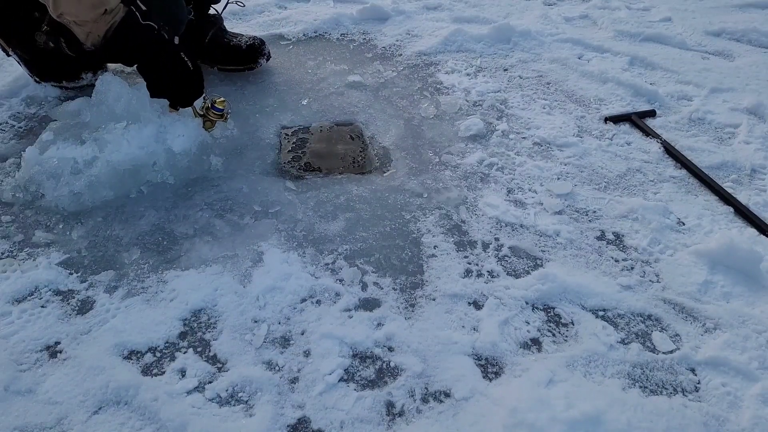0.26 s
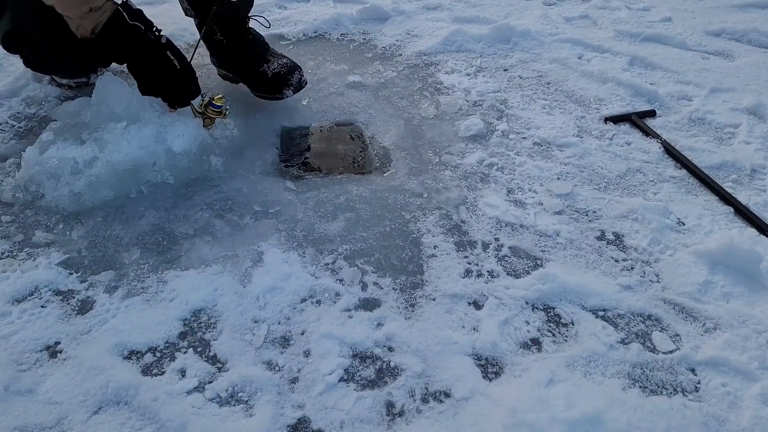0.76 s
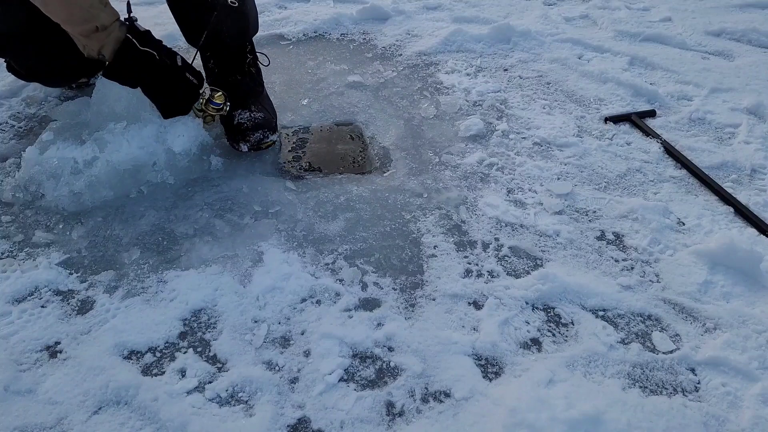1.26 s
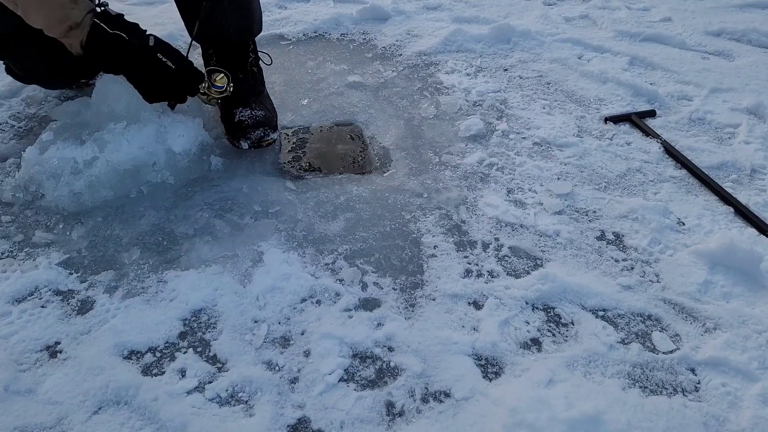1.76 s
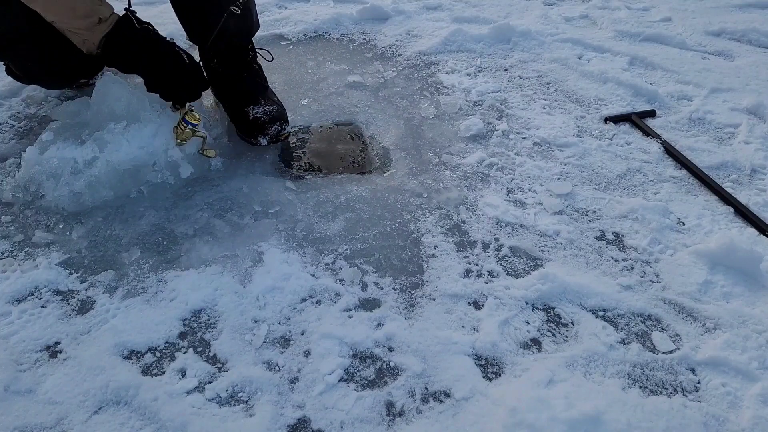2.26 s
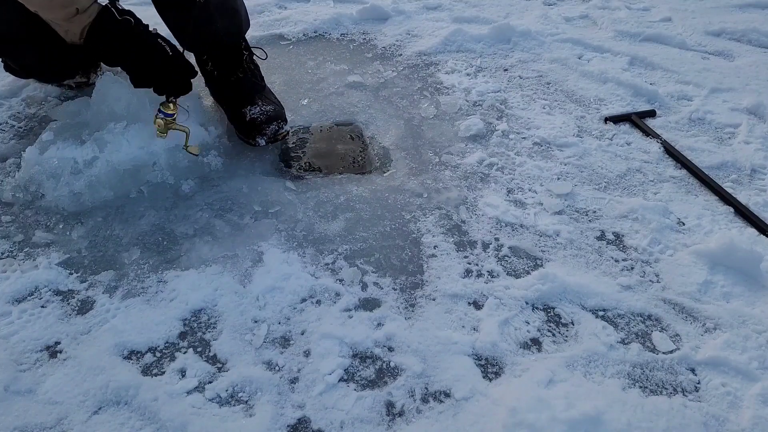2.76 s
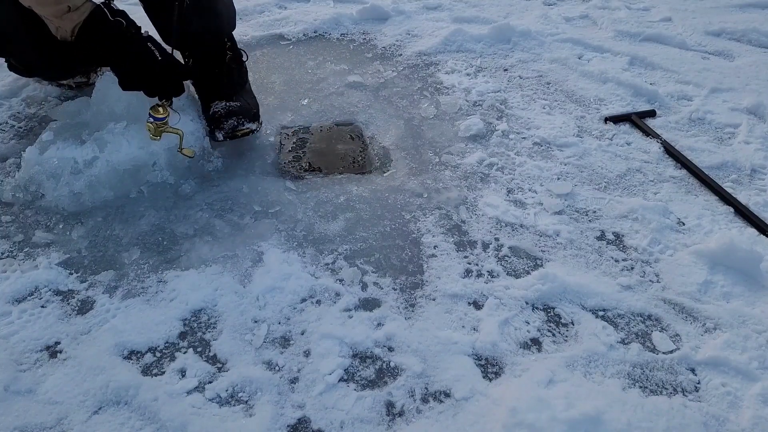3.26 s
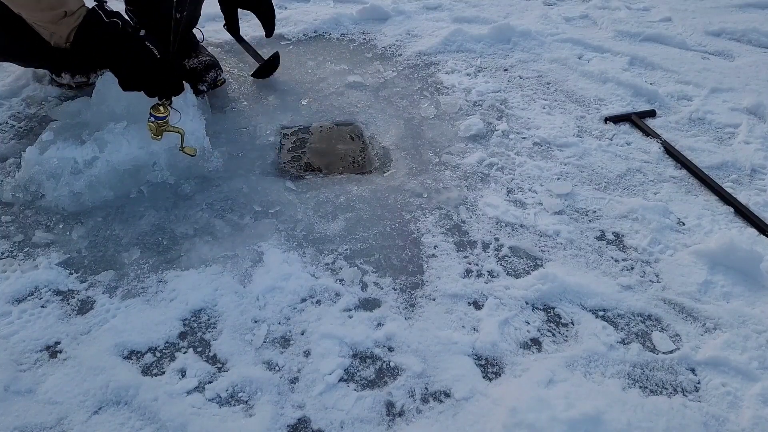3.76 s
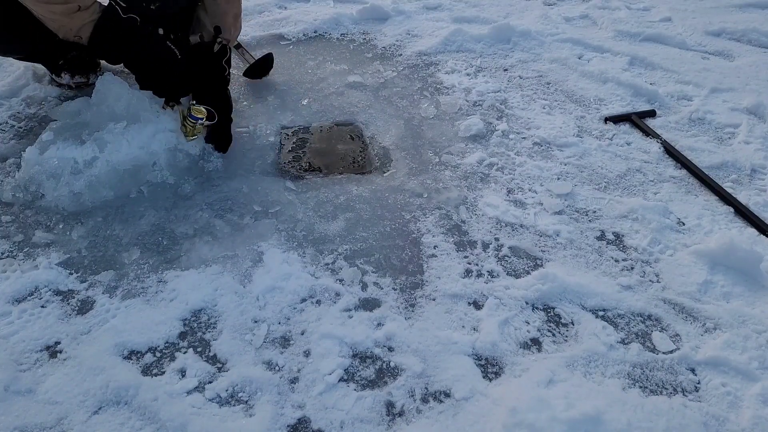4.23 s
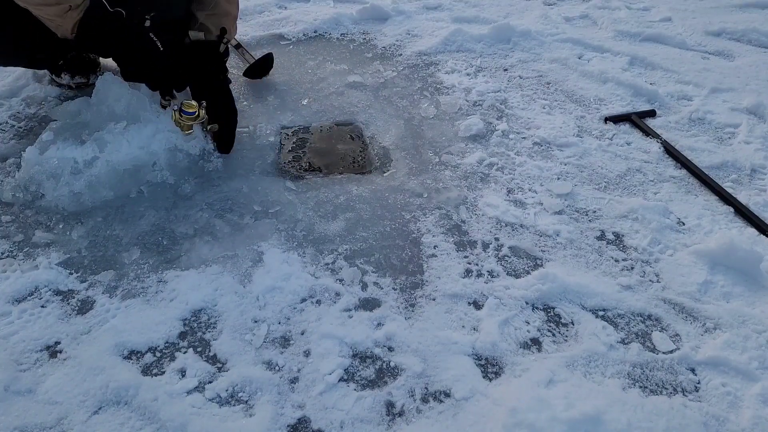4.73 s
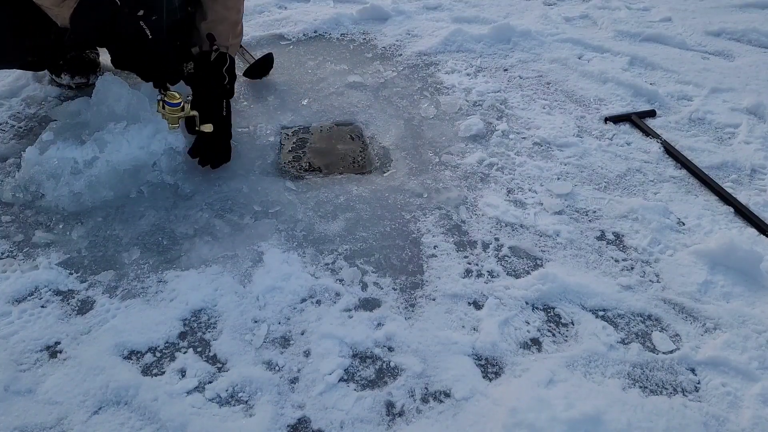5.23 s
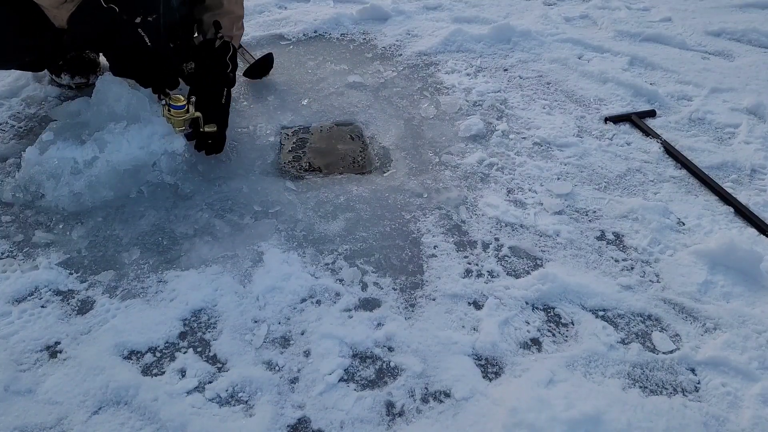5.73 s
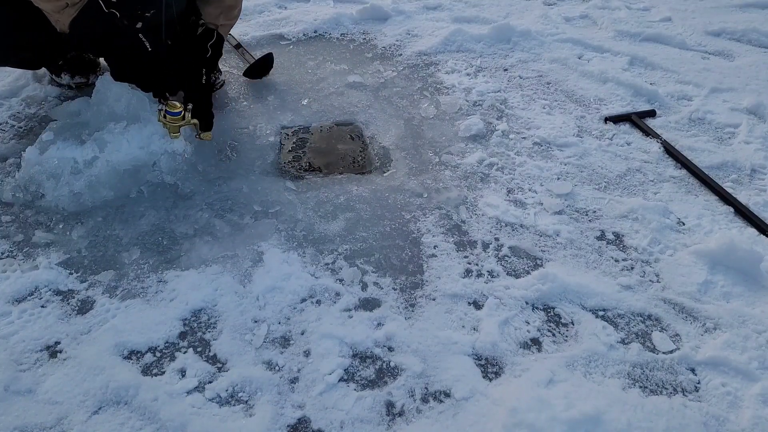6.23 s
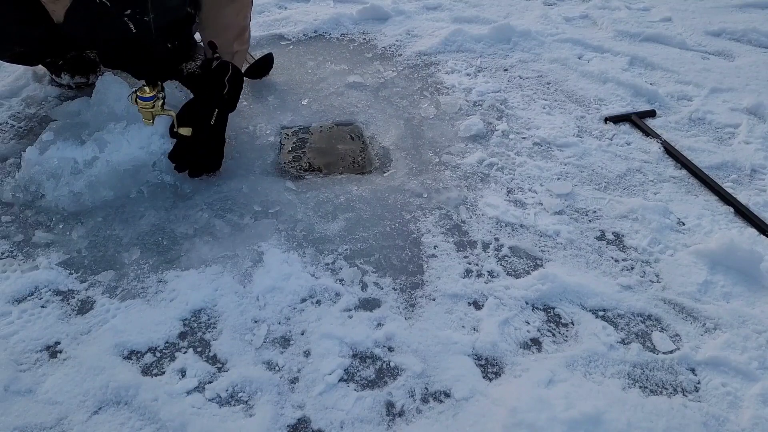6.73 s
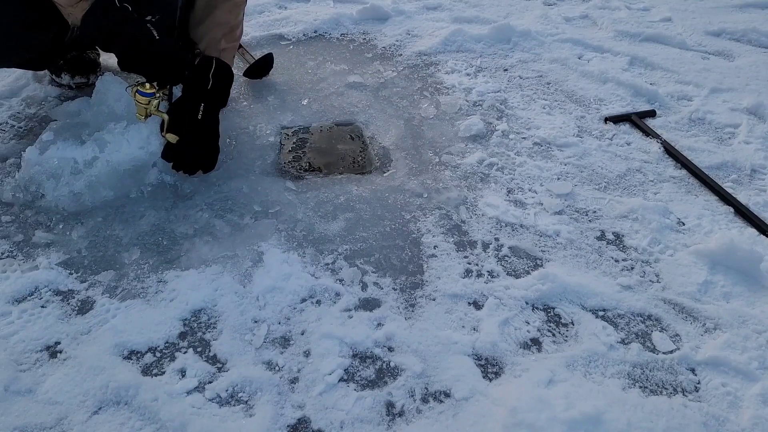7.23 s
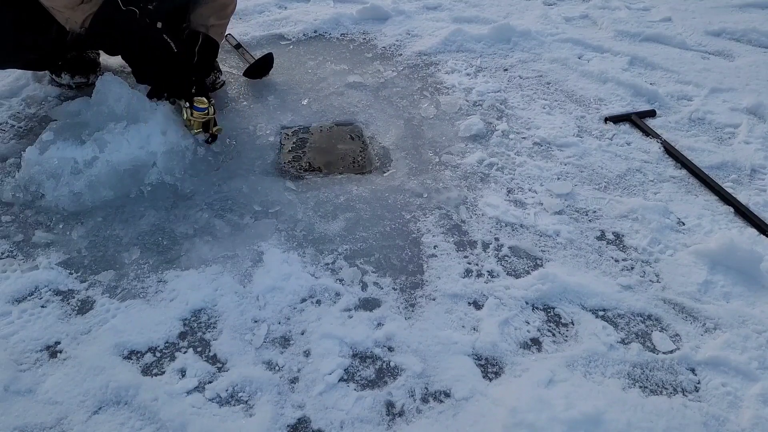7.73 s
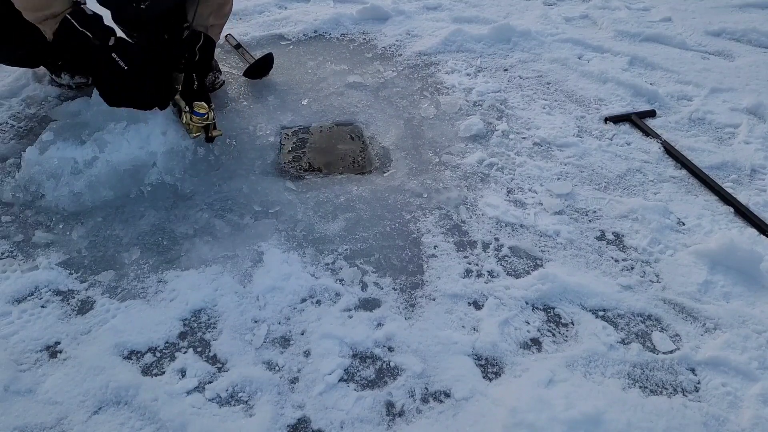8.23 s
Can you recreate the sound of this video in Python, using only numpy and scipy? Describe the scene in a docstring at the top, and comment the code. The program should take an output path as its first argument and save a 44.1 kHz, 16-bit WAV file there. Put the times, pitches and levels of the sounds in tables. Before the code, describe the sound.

Boots and gloves crunch wet slush and snow beside an ice hole while small loose metal clinks brightly; a ladle knocks onto the ice midway.

```python
"""Someone works at a hole in lake ice, left of a two-port microphone, in open air without echo.
From the start boots and gloves crunch slush and snow (noise bursts under pressure curves), crusts snap,
lumps give way (short sines) and loose hard metal clinks (decaying modes). A faint chirp falls at 2.2 s;
a ladle lands on the ice at 3.9 s and bounces (rough modes and a noise crack). Crunch and clinks go on; at
7.7 s a rubber sole squeaks in short slips (wavering sine). Faint steady coloured noise throughout."""
import sys
import numpy as np
from scipy import signal
from scipy.fft import rfft, irfft, next_fast_len
from scipy.io import wavfile
from scipy.ndimage import uniform_filter1d

SR = 44100
rng = np.random.default_rng(int(sys.argv[2]) if len(sys.argv) > 2 else 0)


def amplitude_ratio(level_db):
    """Convert a level in decibels to the matching linear amplitude (field) ratio."""
    exponent = np.asarray(level_db, float) / 20
    return 10 ** exponent


def dump_mix(stems):
    """Bounce the given channels to the path in sys.argv[1] as a 16-bit WAV at rate SR."""
    frames = np.atleast_2d(stems).T  # one column per channel
    limited = np.clip(frames, -1, 1)  # hard clip at full scale
    pcm = np.round(limited * 32767).astype(np.int16)
    wavfile.write(sys.argv[1], SR, pcm)


N = 374409


def unit(x):
    """Scaled to rms 1."""
    return x / np.sqrt(np.mean(x ** 2) + 1e-20)


def along(points, hz):
    """(f/Hz, value) points interpolated on a log frequency axis."""
    f, v = np.transpose(points)
    return np.interp(np.log(hz + 1), np.log(f + 1), v)


def filtered(x, response):
    """x times a complex response of frequency."""
    m = next_fast_len(N + 8192)
    return irfft(rfft(x, m) * response(np.fft.rfftfreq(m, 1 / SR)), m)[..., :N]


def add(track, s, sound):
    """Lays a sound into a track at time s."""
    part = track[round(s * SR):][:len(sound)]
    part += sound[:len(part)]


def sine(cycles):
    """Sine of a phase counted in cycles."""
    return np.sin(2 * np.pi * cycles)


# background noise, relative density: [f/Hz, level/dB]
BACKGROUND_SPECTRUM = [(18, -48), (30, 5.5), (65, 14), (150, 2), (480, 3.5), (1530, -9.5), (2530, -57.5),
                       (3760, -24), (7470, -2.5), (9230, -17.5), (14500, 3), (16500, -24.5)]


def background():
    """Faint steady background noise, uneven across frequency, unrelated at the two ports."""
    noise = rng.standard_normal((2, N))
    return amplitude_ratio(-85.5) * unit(filtered(noise, lambda hz: amplitude_ratio(along(BACKGROUND_SPECTRUM, hz))))


# faint falling chirps: [onset t/s, level/dB, first f/Hz, final f/Hz]
CHIRP_EVENTS = [(2.161, -49, 13500, 8100)]


def chirps():
    """A thin whistle drops quickly, levels out and is gone."""
    fall_s, length_s = 0.0045, 0.0075  # decay constant of the pitch, scale of the envelope
    out, t = np.zeros(N), np.arange(SR // 20) / SR
    for s, db, first_hz, last_hz in CHIRP_EVENTS:
        hz = last_hz + (first_hz - last_hz) * np.exp(-t / fall_s)
        envelope = np.e * t / length_s * np.exp(-(t / length_s) ** 2)
        add(out, s, amplitude_ratio(db) * envelope * sine(np.cumsum(hz) / SR))
    return out


# slips of wet rubber on ice: [centre t/s, level/dB, width at 1/e t/s]
RUBBER_SLIPS = [(7.701, -60.5, 0.019), (7.737, -72, 0.019), (7.8, -66.5, 0.099)]


def flutter():
    """Smoothed noise of rms 1."""
    return unit(uniform_filter1d(uniform_filter1d(rng.standard_normal(N), size=120), size=120))


def squeak():
    """Slipping rubber: an unsteady whistle creeps upward from slip to slip, then levels off."""
    base_hz, creep_hz_per_s, creep_s = 1020, 900, 0.09
    t = np.arange(N) / SR
    since = t - RUBBER_SLIPS[0][0]
    slips = sum(amplitude_ratio(db) * np.exp(-(2 * (t - s) / length) ** 2) for s, db, length in RUBBER_SLIPS)
    level = slips * amplitude_ratio(2.5 * flutter())
    hz = base_hz + creep_hz_per_s * np.clip(since, 0, creep_s)
    waver = 0.07 * np.clip(since / 0.06, 0.2, 1) * flutter()  # grows after the first slip
    return level * sine(np.cumsum(hz * (1 + waver)) / SR)


# single crusts of ice: [t/s, level/dB, relative level of the duller part/dB]
CRUST_SNAPS = [(0.1082, -51, -43), (0.7487, -38.5, -20), (0.921, -50.5, -8), (0.948, -51.5, -33),
               (1.0027, -47.5, -53), (1.056, -36.5, -1.5), (1.113, -32.5, -2.5), (1.303, -46, -17),
               (1.5956, -41, -24), (2.154, -49, -43), (2.3944, -47, -44.5), (3.4455, -48, -0.5),
               (3.7498, -33.5, -21), (3.8027, -39, -18), (3.9602, -42, -8), (4.27, -43, -47),
               (4.432, -46, -18), (4.721, -57.5, -29), (4.865, -43.5, -30), (4.9576, -57, -1),
               (5.1167, -47.5, -4), (5.888, -50, -30), (5.917, -37, -35), (6.788, -53, -22),
               (8.3777, -43.5, -16)]


def snaps():
    """A snapping crust: a few milliseconds of bright noise with a duller knock under it."""
    bright, dull, t = np.zeros(N), np.zeros(N), np.arange(SR // 30) / SR
    for s, db, dull_db in CRUST_SNAPS:
        add(bright, s, amplitude_ratio(db - 60 * t / 0.019) * rng.standard_normal(len(t)))
        add(dull, s, amplitude_ratio(db + dull_db + 8.5 - 60 * t / 0.026) * rng.standard_normal(len(t)))
    high = signal.butter(2, 4000, "high", fs=SR, output="sos")
    middle = signal.butter(2, [1000, 3300], "band", fs=SR, output="sos")
    return signal.sosfilt(high, bright) + signal.sosfilt(middle, dull)


# lumps of ice that give way: [onset t/s, level/dB, f/Hz, length scale/cycles]
ICE_LUMPS = [(0.325, -52.5, 583, 1.3), (0.775, -49, 450, 1.15), (0.868, -44.5, 386, 1.2),
             (1.044, -40, 124, 1.65), (1.117, -43, 170, 1.34), (1.1415, -32, 480, 1.5),
             (1.15, -46.5, 99, 1.1), (2.393, -46, 585, 1.7), (3.22, -44.5, 328, 0.75),
             (3.4447, -51.5, 1510, 3.5), (3.4542, -46.5, 1870, 2.2), (3.754, -43, 234, 1.84),
             (3.782, -50.5, 1050, 5.1), (4.135, -62, 154, 0.75), (4.302, -58.5, 366, 1.3),
             (4.6, -59, 387, 1.9), (4.965, -63, 270, 1.3), (7.033, -61.5, 555, 4.9),
             (7.228, -60.5, 292, 2.7), (7.609, -48.5, 680, 2), (7.924, -56, 256, 2.3)]


def lumps():
    """A lump giving way sounds a few soft cycles, swelling then decaying."""
    out = np.zeros(N)
    for s, db, hz, cycles in ICE_LUMPS:
        turn = np.arange(SR // 10) / SR * hz
        envelope = np.e * 2.16 * (turn / cycles) * np.exp(-2.5 * turn / cycles)
        add(out, s, amplitude_ratio(db) * envelope * sine(turn))
    return out


# ladle landing and bouncing: [t/s, level/dB]
LADLE_HITS = [(3.9265, -24.5), (3.9999, -38.5)]
# modes of bowl and handle: [f/Hz, relative level/dB, t60/s]
LADLE_MODES = [(227, -15, 0.25), (388, -13.5, 0.15), (495, -11.5, 0.11), (741, -13, 0.16),
               (1180, -1, 0.045), (1493, -9, 0.089), (1880, 2.5, 0.066)]


def ladle():
    """Impact on ice: a noise crack, then the dull ring of bowl and handle, roughened by rocking."""
    out, t = np.zeros(N), np.arange(SR // 3) / SR
    for s, db in LADLE_HITS:
        ring = np.zeros(len(t))
        for hz, mode_db, t60_s in LADLE_MODES:
            rocking_rad = 0.06 * np.cumsum(rng.standard_normal(len(t)))
            ring += amplitude_ratio(mode_db - 60 * t / t60_s) * np.sin(2 * np.pi * hz * t + rocking_rad)
        ring *= amplitude_ratio(-7) * (1 - np.exp(-t / 0.0015))
        crack = amplitude_ratio(5.5 - 60 * t / 0.018) * (1 - np.exp(-t / 0.00088))
        crack *= np.diff(rng.standard_normal(len(t) + 1))
        add(out, s, amplitude_ratio(db) * (ring + crack))
    return out


# contacts of the loose metal piece:
# [t/s, level/dB, longest mode relative/dB, lowest mode relative/dB, ring time before limits/s]
METAL_CONTACTS = [(0.1164, -35.5, -7, -25, 0.096), (0.212, -31, 6, -29, 0.1),
                  (0.271, -33.5, -2, -33, 0.027), (0.3348, -36.5, -10, -12, 0.026),
                  (0.344, -35, 6, -31, 0.2), (0.3581, -34.5, 9, -27, 0.094),
                  (0.3962, -38.5, -2, -10.5, 0.1), (0.408, -32.5, 4, -17, 0.05), (0.42, -48, 5, -19, 0.029),
                  (0.4819, -35.5, 7, -12.5, 0.45), (0.5026, -31.5, 1.5, -24, 0.12),
                  (0.5229, -52, 13, -13, 0.16), (0.604, -29, 3, -26, 0.12), (0.668, -38, 3, -13, 0.077),
                  (0.751, -47, 5, -17, 0.21), (0.769, -43, 4, -25, 0.12), (0.846, -53, 11, -20.5, 0.23),
                  (1.0182, -30, 8, -17, 0.069), (1.0574, -41.5, 14.5, -30, 0.05),
                  (1.2054, -28.5, 10.5, -32, 0.063), (1.3246, -38, -16, -5, 0.0089),
                  (1.349, -42.5, -3, -14, 0.0083), (1.466, -46.5, 3, -17, 0.062),
                  (1.537, -39.5, -2, -21, 0.12), (1.7, -35, 9, -36, 0.095), (1.718, -37, 8.5, -24, 0.14),
                  (1.798, -30, -4.5, -28, 0.12), (1.871, -29.5, 0.5, -18, 0.093),
                  (1.923, -23, 3, -19.5, 0.067), (2.213, -31.5, 5, -22, 0.091),
                  (2.251, -30, 6, -4.5, 0.082), (2.28, -38, -1, -22, 0.1), (2.305, -32.5, 6, -6, 0.048),
                  (2.534, -38.5, -3.5, -30, 0.41), (2.598, -34, 14.5, -46, 0.036),
                  (2.728, -35, 1, -26, 0.12), (2.77, -26, 10.5, -16, 0.071), (2.8387, -39, 19, -17, 0.035),
                  (2.857, -29.5, -5, -15, 0.061), (2.9301, -28, 3.5, -10.5, 0.19),
                  (2.995, -36.5, -15, -2.5, 0.026), (3.03, -42.5, 14.5, -6, 0.1),
                  (3.056, -47.5, 17, -9, 0.082), (3.5619, -35, 2, -7.5, 0.022),
                  (3.5787, -42.5, 5, -9, 0.038), (3.592, -44, 4.5, -29.5, 0.077),
                  (4.0056, -34.5, 9.5, -9.5, 0.066), (4.027, -43, 11, -19, 0.055),
                  (4.0482, -34, 5, -13, 0.061), (4.0876, -52, -8, 5.5, 0.051), (4.4843, -24, 3, -17, 0.27),
                  (4.493, -32, 16.5, -13.5, 0.14), (4.5061, -29.5, 12, -11, 0.046),
                  (5.061, -23, 1, -13, 0.078), (5.0874, -33, 10.5, -13, 0.041),
                  (5.3102, -41, 5, -11, 0.024), (5.612, -30.5, 1, -14.5, 0.077), (6.004, -39, 0, -19, 0.18),
                  (6.021, -30.5, -3, -41, 0.072), (6.038, -33.5, -8, -23, 0.11),
                  (6.0718, -47, 4.5, -3, 0.049), (6.2977, -22.5, 5.5, -21, 0.068),
                  (6.3246, -29, -3, -16, 0.03), (6.372, -57.5, 11.5, -18.5, 0.066),
                  (6.6526, -27.5, 6.5, -13, 0.043), (6.6709, -38.5, 6.5, -20, 0.058),
                  (6.688, -39.5, 1, -18, 0.065), (6.8871, -22, 5.5, -10, 0.057),
                  (6.9006, -34, 2, -21, 0.07), (7.0667, -26, -21, -7.5, 0.081), (7.3523, -24, 4, -32, 0.11),
                  (7.37, -36, -6, -20, 0.084), (7.441, -40.5, -4, -13, 0.15),
                  (7.8982, -28, 8.5, -10.5, 0.068), (8.147, -26.5, 8.5, -8.5, 0.036),
                  (8.155, -32, 2, -26, 0.047), (8.211, -50.5, -3, -14, 0.027),
                  (8.462, -35, 13, -9.5, 0.041)]
# its short-lived modes, before the changes from contact to contact: [f/Hz, relative level/dB, t60/s]
METAL_MODES = [(6230, -21, .022), (7645, -12, .035), (8690, -11, .025), (9765, -21, .022),
               (11280, -15, .028), (11820, -7, .045), (12075, -9, .04), (13550, -13, .028),
               (14500, -14, .025), (14945, -6, .06)]


def clinks():
    """Every metal contact chatters and rings the modes afresh; the next firm one chokes what still rings."""
    longest_hz, lowest_hz = 14085, 5430
    rings, chatter, t = np.zeros(N), np.zeros(N), np.arange(SR // 3) / SR
    hz, mode_db, mode_t60_s = np.transpose(METAL_MODES)[:, :, None]
    luck = rng.standard_normal((len(METAL_CONTACTS), 2, len(METAL_MODES), 1))
    for (s, db, longest_db, lowest_db, ring_s), (size, phase) in zip(METAL_CONTACTS, luck):
        # the blow is shared unevenly among the short modes
        share = amplitude_ratio(mode_db + 4.35 * size)
        share = share * np.linalg.norm(amplitude_ratio(mode_db + 2.0)) / np.linalg.norm(share)
        short_t60_s = mode_t60_s * np.clip(ring_s / 0.039, 0.3, 2) ** 0.44
        # loose contact roughens their phase
        rattle_rad = 0.06 * np.cumsum(rng.standard_normal((len(METAL_MODES), len(t))), axis=1)
        held_hz = hz * (1 + 0.0025 * phase)
        short = share * amplitude_ratio(-60 * t / short_t60_s)
        short = short * np.sin(2 * np.pi * held_hz * t + 9 * phase + rattle_rad)
        short = short.sum(axis=0) * (1 - np.exp(-t / 0.0001))
        # the ring holds, then is muffled as the piece settles on cloth
        fade = (t / np.clip(ring_s, 0.03, 0.4)) ** 1.147
        # a fainter twin in opposite phase rings on: the note can dip, then swell again
        lingering = amplitude_ratio(-18.5 - 60 * t / 0.19)
        longest = amplitude_ratio(longest_db) * (amplitude_ratio(-60 * fade) - lingering) * (1 - np.exp(-t / 0.0012))
        longest = longest * sine(longest_hz * (1 + 0.001 * phase[0]) * t)
        lowest = amplitude_ratio(lowest_db - 82 * fade) * (1 - np.exp(-t / 0.001))
        lowest = lowest * sine(lowest_hz * (1 + 0.003 * phase[1]) * t)
        later = [when - s for when, force_db, *_ in METAL_CONTACTS if when > s and force_db > db - 12]
        choke = np.exp(-np.clip(t - min(later, default=9), 0, None) / 0.00314)
        add(rings, s, amplitude_ratio(db) * (short + longest + lowest) * choke)
        burst = amplitude_ratio(-20.5 - 60 * t / 0.0019) + amplitude_ratio(-14 - 60 * t / 0.068)
        add(chatter, s, amplitude_ratio(db) * burst * rng.standard_normal(len(t)))

    def tuned(f):
        """The chatter keeps the modes going: 120 Hz wide resonances."""
        modes_hz = [lowest_hz, *hz[:, 0], longest_hz]
        return 1 + 0.85 * sum(1j * f * 120 / (c * c - f * f + 1j * f * 120) for c in modes_hz)

    high = signal.butter(2, 3500, "high", fs=SR, output="sos")
    return rings + signal.sosfilt(high, filtered(chatter, tuned))


def breaks(rate, spread_db, life_s):
    """Crystals break at random, rate per second: an envelope of short bursts of uneven size, rms 1."""
    sizes = amplitude_ratio(spread_db * np.minimum(rng.exponential(size=N), 2.5))
    kicks = (rng.random(N) < rate / SR) * sizes
    decay = np.exp(-np.arange(SR // 20) / SR / life_s)
    return unit(np.abs(signal.fftconvolve(kicks, decay)[:N]))


def grit(spectrum, bursts, hiss):
    """Coloured noise of rms 1 that bursts over a steady bed."""
    noise = (hiss + bursts) * rng.standard_normal(N)
    return unit(filtered(noise, lambda hz: amplitude_ratio(along(spectrum, hz))))


def chips(count, middle_hz, cycles, spread_db):
    """Small pieces of ice knock at random, each a few cycles at its own pitch; rms 1."""
    s, pitch, size = rng.random(count), rng.standard_normal(count), rng.exponential(size=count)
    k = np.arange(400)
    turn = (middle_hz * np.exp(0.6 * pitch))[:, None] * k / SR
    notes = amplitude_ratio(spread_db * np.minimum(size, 3))[:, None] * turn * np.exp(-2 * turn / cycles) * sine(turn)
    places = (s * N).astype(int)[:, None] + k
    return unit(np.bincount(places.ravel(), notes.ravel())[:N])


# presses of boot or glove into the slush:
# [full pressure t/s, crunch level/dB, scrape level/dB, thud level/dB, build-up scale/s, dying scale/s];
# both scales are limited to 0.01..1 s
SLUSH_PRESSES = [(0, -60.5, -86, -91, .05, -0.03), (0.135, -58, -84, -86, 0.046, 0),
                 (.32, -75, -68, -94, 0.2, 0.2), (0.413, -52.5, -95, -86, 0.07, 0.07),
                 (0.618, -58, -69.5, -67, 0.083, 0.33), (.8, -65, -72, -81, 0.47, 9),
                 (0.869, -57, -58.5, -57.5, 0.045, -0.34), (1.034, -46.5, -50.5, -55.5, 0.041, 0.2555),
                 (1.114, -45.5, -54, -54, 0.11, 0.1245), (1.602, -61.5, -85, -90, 0.29, 0.03),
                 (1.733, -70.5, -85.5, -94, 0.067, 14), (1.884, -57.5, -77, -99, 0.14, 0.4),
                 (2.347, -47.5, -83, -87, 0.014, 0.18), (2.386, -41, -63, -73, 0.12, -0.02),
                 (2.422, -68, -64.5, -76.5, 0.1, 0.23), (2.518, -52.5, -91, -90, 0.096, 0.24),
                 (2.868, -66.5, -84.5, -101, 0.7, 1), (2.966, -53, -79, -80, 0.03, 0.12),
                 (3.002, -69.5, -69.5, -93, 0.048, 0.5), (3.135, -37, -51, -53, 0.018, 0.1232),
                 (3.166, -42, -48, -51, 0.049, 0.09), (3.421, -68.5, -85.5, -98, 0.28, 0.9),
                 (3.753, -62.5, -60, -58.5, 0.013, 0.17), (4.003, -47.5, -60, -85, 0.03, 0.2),
                 (4.238, -60.5, -102, -77, 0.28, -1), (4.326, -53.5, -90, -71.5, 0.085, 0.25),
                 (4.4, -82, -68, -81, 0.19, 0.46), (4.453, -49, -56, -67, 0.054, 0.17),
                 (4.85, -50.5, -57.5, -72, 0.057, 0.12), (5.065, -63.5, -73, -104, 0.26, 0.1),
                 (5.187, -42, -52, -64, 0.11, 0.1151), (5.429, -58.5, -68.5, -79, 0.13, 0.5),
                 (5.465, -41, -51.5, -57, 0.028, 0.036), (5.66, -70, -80, -100, 0.33, -9),
                 (5.749, -43, -54, -66.5, 0.072, 0.08), (5.92, -56, -71, -85, 0.12, 0.7),
                 (6.022, -42.5, -52, -63, 0.055, -0.0068), (6.059, -48.5, -55.5, -57, 0.11, 0.06),
                 (6.172, -56, -69.5, -90, 0.055, 0), (6.284, -43.5, -53, -63, 0.033, 0.105),
                 (6.313, -44.5, -52, -48, 0.052, 0), (6.595, -63.5, -69, -75, 0.094, 0.3),
                 (6.78, -63, -70, -96, 0.68, 0.5), (6.916, -50.5, -62, -91, 0.16, 0),
                 (7.125, -46.5, -57.5, -63, 0.087, 0.09), (7.255, -60.5, -72, -73, 0.11, 0.05),
                 (7.36, -57.5, -67, -82, 0.14, 0.17), (7.616, -51.5, -63, -84, 0.26, 0.05),
                 (7.765, -63, -74, -87, 0.012, 0.8), (7.896, -47, -55.5, -58, 0.16, 0.11),
                 (8.173, -53.5, -60, -72.5, 0.2, 0.04), (8.384, -67, -75, -102, 0.26, 1)]
# slush settling between presses: [crunch level/dB, scrape level/dB, thud level/dB]
SETTLING_DB = [-80, -102, -101]
# slope factors on a fall of 20 dB per scale: [crunch, scrape, thud]
SLOPES = [2.01, 2.23, 2.14]


def pressure():
    """Gains of crunch, scrape and thud: every press builds, then dies away; their powers add."""
    blunt_db = 4.5  # rounds the top of a press
    t = np.arange(0, N, 32)[:, None] / SR
    s, *peaks_db, rise_s, fall_s = np.transpose(SLUSH_PRESSES)
    before, after = (s - t) / np.clip(rise_s, 0.01, 1), (t - s) / np.clip(fall_s, 0.01, 1)
    below_db = 20 * np.where(t < s, before, after)
    below_db = np.hypot(below_db, blunt_db) - blunt_db
    gains = []
    for peak_db, rest_db, slope in zip(peaks_db, SETTLING_DB, SLOPES):
        power = amplitude_ratio(rest_db) ** 2 + (amplitude_ratio(peak_db - slope * below_db) ** 2).sum(axis=1)
        gains.append(np.interp(np.arange(N) / SR, t[:, 0], np.sqrt(power)))
    return gains


# relative densities of the three layers: [f/Hz, level/dB]
CRUNCH_SPECTRUM = [(700, -42), (1500, -15.5), (3000, -5), (7000, -3), (9200, -6.5), (13500, 2), (16500, -5)]
SCRAPE_SPECTRUM = [(210, -25.5), (350, -12), (497, -10), (924, -8.5), (1280, -9), (3000, -9.5),
                   (3900, -49.5), (6600, -120)]
THUD_SPECTRUM = [(18, -50.5), (55, -2.5), (118, -7), (247, 3), (317, 0.5), (419, 0), (700, -6), (910, -19),
                 (1540, -120)]


def slush():
    """Crushing gives bright grit, scraping duller grit with knocking chips; weight thuds into the ice."""
    crushing, scraping, weight = pressure()
    fine = breaks(rate=1000.0, spread_db=8.5, life_s=0.0008)
    coarse = breaks(rate=300.0, spread_db=5.5, life_s=0.006)
    crunch = grit(CRUNCH_SPECTRUM, 0.6 * fine + 0.3 * coarse, hiss=0.55)
    scrape = grit(SCRAPE_SPECTRUM, coarse, hiss=0.78)
    scrape = scrape + 0.5 * chips(count=3500, middle_hz=905.0, cycles=3.9, spread_db=4.0)
    thud = grit(THUD_SPECTRUM, coarse, hiss=0.73)
    return crushing * crunch + scraping * scrape + weight * thud


# the housing shades the right port: [f/Hz, left over right level/dB at shade 1]
PORT_SHADOW = [(300, 0), (1200, 4), (4500, 7), (9000, 17.5), (14500, 21)]


def ports(x, scatter_db, shade):
    """Left port leads, right is shaded; the moving body scatters the treble, most at the shaded port."""
    lead_s = 0.00017
    hz, _, z = signal.stft(x, SR, nperseg=256)
    field = rng.standard_normal((2, 2) + z.shape)
    field = unit(uniform_filter1d(uniform_filter1d(field, size=3, axis=2), size=12, axis=3))
    treble = ((hz + 160) / (hz + 900))[:, None]
    gain = 1 + amplitude_ratio(scatter_db)[:, None, None] * treble * (field[0] + 1j * field[1])
    heard = signal.istft(z * gain, SR, nperseg=256)[1][:, :N]
    sides = np.array([[1], [-1]])  # left, right

    def path(f):
        shadow = amplitude_ratio(shade * along(PORT_SHADOW, f) * (sides - 1) / 2)
        return shadow * np.exp(1j * np.pi * f * lead_s * sides)

    return filtered(heard, path)


def scene():
    """All work is on the left, slush and metal scattered apart, over the background noise."""
    work = ladle() + lumps() + snaps() + squeak() + chirps() + slush()
    ground = ports(work, scatter_db=[-11.0, -3.0], shade=0.97)
    metal = ports(clinks(), scatter_db=[-12.0, -4.0], shade=1.0)
    return metal + ground + background()


def low_pass(x):
    """Removes everything above the highest recorded frequency."""
    return signal.sosfilt(signal.butter(12, 16800, fs=SR, output="sos"), x)


def record(dry):
    """Deep bass rolls off; a steep low-pass near 16 kHz, with a weak constant gain above it."""
    def response(hz):
        bass = hz ** 2 / (hz ** 2 + 45 ** 2)
        treble = 1 / np.sqrt(1 + (hz / 15950) ** 200)
        return bass * np.maximum(treble, 0.03 * (hz < 16800))  # the weak gain ends at 16.8 kHz

    return low_pass(filtered(dry, response))


dry = scene()
out = record(dry)
dump_mix(out)
```